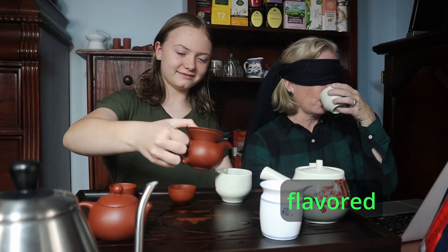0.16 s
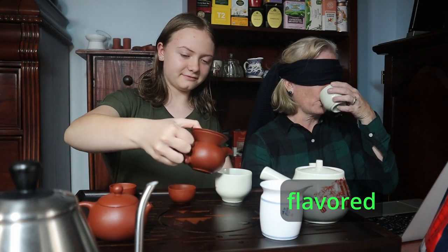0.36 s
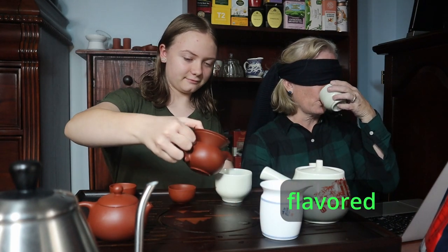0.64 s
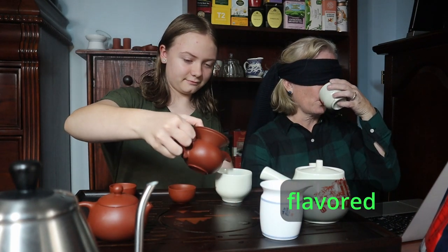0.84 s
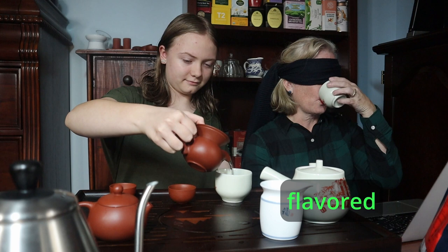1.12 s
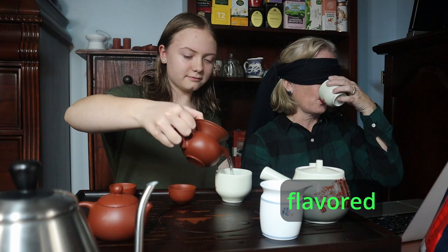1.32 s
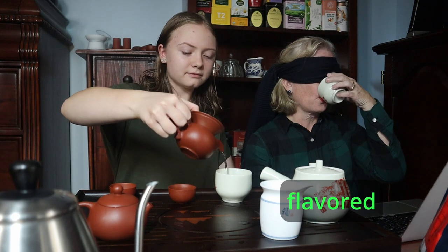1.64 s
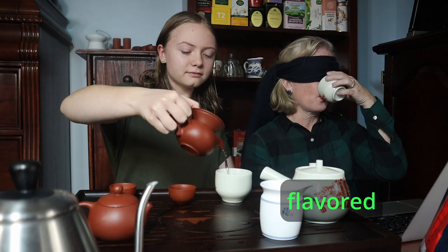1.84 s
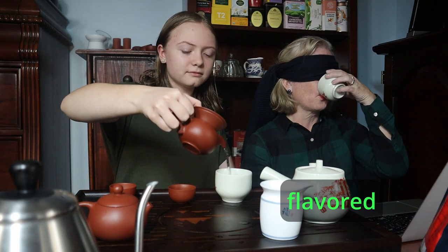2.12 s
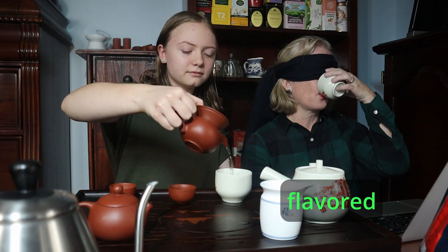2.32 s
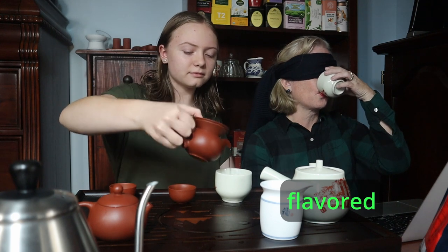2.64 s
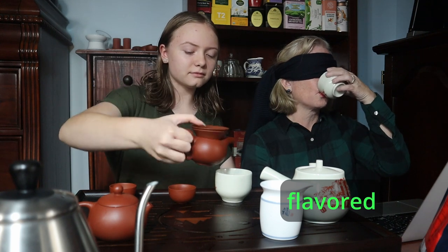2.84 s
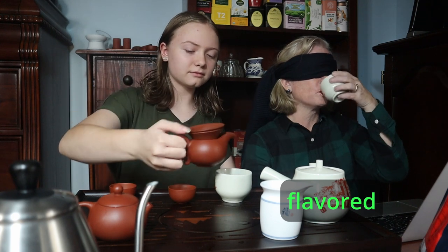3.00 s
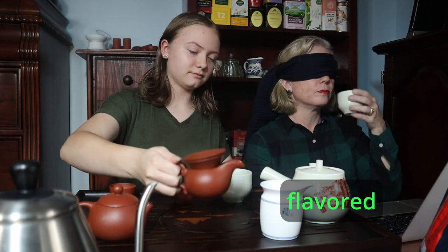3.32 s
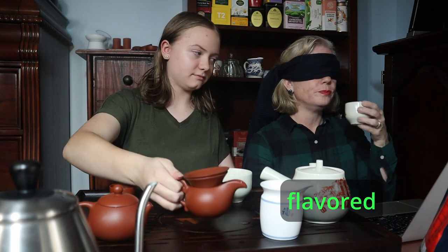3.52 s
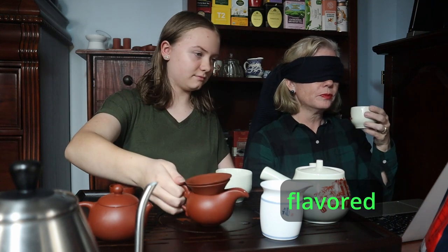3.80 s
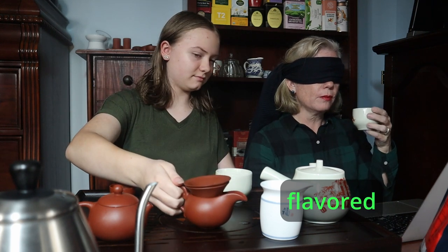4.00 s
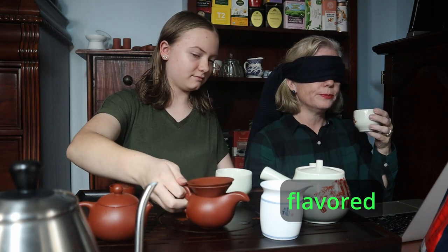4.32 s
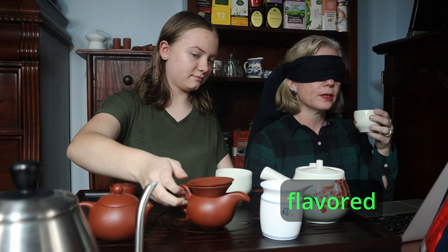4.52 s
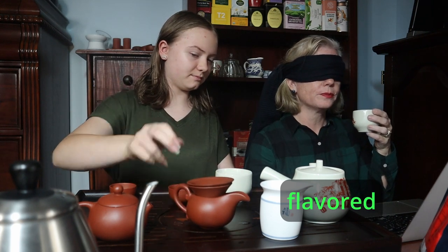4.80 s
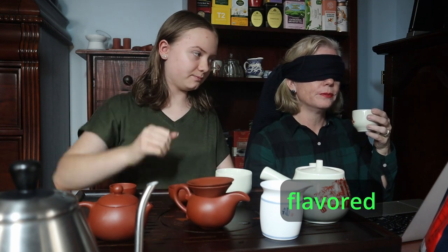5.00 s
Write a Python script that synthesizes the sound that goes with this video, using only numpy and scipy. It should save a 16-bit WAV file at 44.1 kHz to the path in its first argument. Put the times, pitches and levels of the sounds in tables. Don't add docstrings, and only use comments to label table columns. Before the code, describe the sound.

A quiet furnished room, heard closely in mono with low hiss, a trace of mains hum and a short soft echo. From 0 to 2 s there are only faint gritty rubs of a clay lid, cloth rustle and a thin trickle. From about 2.3 s drops plink in the cup, thickening at 2.5-2.8 s; at 2.85-2.95 s the spout gives rapid hollow gulps with rising chirps, fizz and a sharp splash tick. At 3.23-3.28 s crockery knocks with a bright clack and brief ring; a duller double knock follows at 3.8 s. After a soft nudge near 4.03 s, the pot lands at 4.18 s, by far the loudest event, a hard hollow wooden knock with clay ringing. It drags and rocks at 4.51, 4.65 and 4.75 s, progressively weaker, amid thin squeals and finger snaps. Small dry taps at 5.0-5.15 s close it.

```python
import sys
import numpy as np
from scipy import signal
from scipy.fft import rfft, irfft, next_fast_len
from scipy.io import wavfile
from scipy.ndimage import uniform_filter1d, map_coordinates

SR = 44100
rng = np.random.default_rng(int(sys.argv[2]) if len(sys.argv) > 2 else 0)


def wav_record(signal):
    frames = np.transpose(np.atleast_2d(signal))
    bounded = np.clip(frames, -1, 1)
    quanta = np.round(bounded * 32767).astype(np.int16)
    wavfile.write(sys.argv[1], SR, quanta)


def field_ratio(decibels):
    return 10 ** (np.asarray(decibels, dtype=float) / 20)


N = 227108

# start_s, peak_db, pitch_hz
BUBBLES = [(2.3407, -60.5, 2010), (2.4285, -58, 2250), (2.44, -63, 2010), (2.4595, -57, 2050),
           (2.469, -59, 1930), (2.475, -59, 1870), (2.494, -60, 2100), (2.5259, -47.5, 2256),
           (2.5397, -47, 2180), (2.547, -52, 1990), (2.557, -65, 1960), (2.581, -61, 2450),
           (2.615, -56, 2230), (2.6295, -43.5, 2034), (2.638, -51, 1930), (2.645, -56, 1940),
           (2.7078, -56.5, 1930), (2.726, -73, 1920), (2.7403, -52, 1970), (2.7458, -50, 1865),
           (2.7551, -57.5, 2020), (2.778, -47.5, 2095), (2.787, -63, 1960), (2.796, -60.5, 2050),
           (2.814, -55, 1930), (2.8234, -39, 1865), (2.832, -50.5, 1840), (2.84, -48, 1930),
           (2.925, -47.5, 2130), (3.6145, -52.5, 2250), (3.674, -64, 2340), (3.72, -66, 2230),
           (3.733, -68, 2420), (3.754, -65, 2230), (3.768, -71, 2320)]
# freq_hz, level_db
THUD = [(35, -55), (60, -25), (467, -1), (762, 6.5), (1030, -5.5), (1190, 2), (1330, -5), (2950, -19.5),
        (4700, -27), (5700, -26), (7500, -39.5), (15800, -75.5)]


def unit(x):
    return x / np.sqrt(np.mean(x ** 2) + 1e-20)


def along(points, hz):
    f, v = np.transpose(points)
    return np.interp(np.log(hz + 1), np.log(f + 1), v)


def wobble(rate):
    knots = rng.standard_normal(int(N * rate / SR) + 4)
    return map_coordinates(knots, [np.arange(N) * rate / SR])


def swells(rows):
    t = np.arange(N) / SR
    return sum(field_ratio(db) * np.exp(-0.5 * ((t - s) / spread) ** 2) for s, spread, db in rows)


def filtered(x, response):
    m = next_fast_len(len(x) + 8192)
    return irfft(rfft(x, m) * response(np.fft.rfftfreq(m, 1 / SR)), m)[:len(x)]


def modes(rows, f):
    return sum((-1) ** k * field_ratio(db) * 1j * f * w / (c * c - f * f + 1j * f * w)
               for k, (c, w, db) in enumerate(rows))


def noise(spectrum):
    return unit(filtered(rng.standard_normal(N), lambda hz: field_ratio(along(spectrum, hz))))


def add(track, s, piece):
    part = track[max(round(s * SR), 0):][:len(piece)]
    part += piece[:len(part)]


def room(x, delay=0.0066):
    # freq_hz, t60_s
    decay = [(150, 0.5), (500, 0.26), (2000, 0.33), (8000, 0.27), (15000, 0.24)]
    hz, t, z = signal.stft(rng.standard_normal(SR // 2), SR, nperseg=256)
    fading = z * field_ratio(-60 * t / along(decay, hz)[:, None])
    tail = signal.istft(fading, SR, nperseg=256)[1]
    late = np.pad(x, (round(delay * SR), 0))
    return signal.fftconvolve(late, tail / np.linalg.norm(tail))[:len(x)]


def bubbles(rows, t60, rise, lift_db, attack_s):
    t60 = np.clip(t60, 0.003, 0.4)
    out = np.zeros(N)
    t = np.arange(round(SR * t60) + 64) / SR
    for s, db, hz in rows:
        climb = rise * (t60 * (np.exp(-t / t60) - 1) + t)
        tone = np.sin(2 * np.pi * hz * (t + climb))
        swell = 1 - np.exp(-(t / max(attack_s, 1e-4)) ** 2)
        add(out, s, field_ratio(db + lift_db - 60 * t / t60) * swell * tone)
    return out


def ticks(rows):
    out = np.zeros(N)
    t = np.arange(512) / SR
    for s, db, hz in rows:
        burst = field_ratio(-60 * t / 0.0107) * rng.standard_normal(512)
        crack = filtered(burst, lambda f: modes([(hz, 0.49 * hz, 0)], f) ** 2)
        add(out, s, field_ratio(db - 0.5) * crack / np.abs(crack).max())
    return out


def blows(rows, body, between, between_db, wet_db, top_hz, click_db):
    out = np.zeros(N)
    t = np.arange(SR * 2 // 5) / SR
    for s, db, tilt_db, t60 in rows:
        contact = field_ratio(-60 * t / max(t60, 0.003)) * (1 - np.exp(-t / 0.0011)) * rng.standard_normal(len(t))
        contact += field_ratio(click_db) * np.linalg.norm(contact) * (t == t[8])

        def slope(f):
            return field_ratio(tilt_db * np.log2((f + 100) / 1000)) * (1j * f / (120 + 1j * f)) ** 2

        ring = unit(filtered(contact, lambda f: slope(f) * modes(body, f) / (1 + 1j * f / top_hz) ** 3))
        clack = filtered(contact[::-1], lambda f: slope(f) * field_ratio(along(between, f)))[::-1]
        clack = unit(clack * (1 - np.exp(-(t / 0.0023) ** 2)))
        hit = ring + field_ratio(between_db) * clack
        hit = field_ratio(db + 0.5) * hit / np.abs(hit).max()
        colour = np.sqrt(np.abs(uniform_filter1d(np.abs(rfft(hit)) ** 2, size=180)))
        first = np.roll(irfft(colour, len(t)), shift=150)
        add(out, s, hit + field_ratio(wet_db) * room(first))
    return out


def quiet():
    # freq_hz, level_db
    hiss = [(12, -27.5), (20, -3), (77, -8.5), (120, -9), (159, -18), (391, -19.5), (437, -38),
            (595, -26.5), (725, -29.5), (1930, -36.5), (2230, -36), (5160, -35.5), (16300, -42.5)]
    # freq_hz, level_db
    mains = [
        (59.2, -72.5),
        (177.6, -77.5),
        (296.1, -85),
    ]
    # freq_hz, level_db
    cloth_colour = [(120, -45.5), (200, 0), (350, -8), (461, -3.5), (1000, -25), (1300, -49.5),
                    (2200, -120)]
    stream_colour = [(530, -39.5), (900, -5.5), (1560, -2.5), (2130, -3), (2350, 1.5), (2870, -11.5),
                     (8000, -21), (10400, -57), (17600, -120)]
    # middle_s, spread_s, level_db
    arm = [
        (.72, 0.16, -73.5),
        (1.58, 0.096, -74),
        (2.95, 0.11, -74),
        (3.85, 0.22, -81),
        (4.28, 0.093, -64),
        (4.62, 0.12, -63.5),
    ]
    # middle_s, spread_s, level_db
    flow = [
        (.68, 0.2, -72.5),
        (2.75, 0.23, -79),
        (3.4, 0.18, -86.5),
        (3.82, 0.053, -81.5),
        (4.29, 0.061, -74.5),
        (4.67, 0.059, -65.5),
        (5.15, 0.084, -81),
    ]
    t = np.arange(N) / SR
    hum = sum(field_ratio(db + 2.5 + 0.61 * wobble(2.5)) * np.sin(2 * np.pi * hz * t + 1.3 * wobble(8.2))
              for hz, db in mains)
    cloth_rest_db, stream_rest_db = -82, -95.5
    cloth = (field_ratio(cloth_rest_db) + swells(arm)) * field_ratio(0.56 * wobble(13)) * noise(cloth_colour)
    stream = (field_ratio(stream_rest_db) + swells(flow)) * field_ratio(0.54 * wobble(26)) * noise(stream_colour)
    return field_ratio(-72) * noise(hiss) + hum + cloth + stream


def lid():
    # middle_s, half_length_s, level_db, hollow_db, bright_db
    grinds = [(0.135, 0.022, -82, 22, -11), (0.31, 0.0085, -81, 26, 6), (0.402, 0.028, -57, 4, -1.5),
              (0.582, 0.022, -73, 10, 9), (0.652, 0.016, -58.5, 16, 2), (0.663, 0.0091, -49.5, 4.5, 3),
              (0.744, 0.044, -61.5, 7.5, 8), (1.082, 0.043, -70, 9.5, 2), (1.206, 0.032, -64.5, 3, 2.5),
              (1.5, 0.024, -69, 1, 3.5), (1.537, 0.02, -74, 12, 6.5), (1.734, 0.02, -67.5, 6, -1.5),
              (1.757, 0.035, -64.5, 3, 1), (1.885, 0.031, -67, 6.5, 3)]
    # freq_hz, width_hz, level_db
    clay = [(933, 90, -4.5), (1930, 137, 5), (2256, 350, -6), (2780, 290, -12.5), (4010, 300, -11),
            (4860, 150, -19.5), (5600, 70, -8), (9000, 260, -23.5), (10870, 64, -23), (12300, 200, -28),
            (14000, 160, -45), (15300, 130, -45)]
    rim_hz, rim_width_hz = 5660, 220
    tipped_s, upright_db = 1.0, -14
    out = np.zeros(N)
    for s, half, db, hollow_db, bright_db in grinds:
        n = round(2 * half * SR)
        grit = np.hanning(n) ** 0.72 * rng.standard_normal(n)
        grain = np.repeat(rng.standard_normal(n // 64 + 1), 64)[:n]
        grit = grit * field_ratio(0.62 * grain)
        balance = [(1000, hollow_db), (1700, 0.011), (2400, 0), (3500, bright_db)]

        def colour(f):
            body = modes(clay, f)
            return body * np.abs(body) ** 0.1 * field_ratio(along(balance, f))

        def damp(f):
            return field_ratio(upright_db * (s < tipped_s) * np.exp(-((f - rim_hz) / rim_width_hz) ** 2))

        rub = filtered(np.pad(grit, (0, 600)), lambda f: colour(f) * damp(f))
        add(out, s - half, field_ratio(db) * unit(rub))
    return out + field_ratio(-14.0) * room(out)


def fingers():
    # start_s, peak_db, centre_hz
    snaps = [(3.7952, -52, 6000), (3.8262, -47, 6440), (3.2752, -45, 4300), (4.7752, -60, 5400),
             (0.3094, -64, 5300), (4.3336, -58.5, 8900), (4.3875, -68, 11200), (4.4245, -67, 11100),
             (4.6946, -54, 13500), (4.7008, -41.5, 10100), (4.7422, -42, 10900), (4.7747, -53, 9100),
             (5.0654, -49, 15200), (5.0679, -43.5, 5700), (5.012, -72, 6000), (5.021, -61, 5000),
             (5.088, -63.5, 12060), (5.124, -57.5, 8000), (5.136, -55, 10800), (5.146, -64, 12000)]
    # start_s, peak_db, pitch_hz
    pings = [(4.1772, -26, 3190), (4.1782, -36.5, 4410), (4.1781, -35.5, 5570), (4.1805, -25, 1640),
             (4.1105, -63.5, 5500), (4.1125, -57, 1530), (4.1335, -54, 2300), (4.6511, -42.2, 3420),
             (4.6512, -51.5, 4270), (4.6691, -45, 2160), (4.6801, -51.2, 2100), (4.6861, -54, 3040),
             (4.6938, -44.5, 5630), (4.7003, -42.7, 8580), (4.7412, -44.2, 2770), (4.7561, -56, 5240),
             (4.9921, -68, 4570), (5.0196, -65.2, 2250), (5.0678, -61.2, 2830), (5.1313, -43, 2830),
             (5.1375, -42.5, 2670)]
    taps = ticks(snaps) + bubbles(pings, 0.014, rise=0.0089, lift_db=3.0, attack_s=0.00036)
    return taps + field_ratio(-13.0) * room(taps)


def squeals():
    # start_s, length_s, level_db, pitch_hz
    tones = [(0.439, 0.65, -87, 2380), (3.679, 0.027, -69, 920), (4.247, .17, -71.5, 3370),
             (4.38, 0.2, -71.5, 3220), (4.362, 0.11, -78, 4500), (4.365, 0.096, -82, 13000),
             (4.52, 0.04, -75, 12200), (4.552, 0.099, -76, 5880), (4.62, .04, -71.5, 9000),
             (4.664, 0.022, -73, 10000), (4.682, 0.077, -74, 6050), (4.75, .018, -64, 11800),
             (4.786, 0.05, -76, 10000), (4.797, 0.03, -76.5, 6050)]
    out = np.zeros(N)
    for s, length, db, hz in tones:
        u = np.linspace(0, 1, round(length * SR))
        pitch = hz * (1 + 0.002 * wobble(180)[:len(u)])
        fade = np.sin(np.pi * u) ** 0.4 * field_ratio(2 * wobble(60)[:len(u)] - 5 * u)
        add(out, s, field_ratio(db) * fade * np.sin(2 * np.pi * np.cumsum(pitch) / SR))
    return out


def slide():
    # middle_s, spread_s, level_db
    drag = [
        (4.104, 0.082, -56.5),
        (4.33, 0.086, -57),
        (4.39, 0.021, -57),
        (4.465, 0.052, -48),
        (4.64, 0.22, -62.5),
    ]
    # middle_s, spread_s, level_db
    slips = [(4.47, 0.04, -78), (4.513, 0.017, -69.5), (4.61, 0.064, -74.5), (4.685, 0.021, -69.5),
             (4.74, 0.021, -59.5), (4.79, .025, -81), (4.845, 0.0048, -73.5), (4.945, 0.0043, -81.5),
             (5.04, 0.019, -81.5), (5.09, 0.015, -81)]
    # freq_hz, width_hz, level_db
    scuff = [(265, 30, -6), (430, 40, -9.5), (680, 69, 0.5), (925, 60, -2.5), (1220, 120, -13),
             (1600, 360, -17), (2050, 200, -20), (2360, 200, -25), (3080, 230, -23), (4540, 300, -38)]
    # freq_hz, level_db
    skin = [(1760, -30), (3000, -1.5), (4370, -6.5), (5200, -4), (5650, -6.5), (10700, -12), (15800, -20)]
    pressure = swells(drag) * field_ratio(-10.0 + 2.2 * wobble(60))
    scrape = filtered(rng.standard_normal(N), lambda f: modes(scuff, f) * (f / (f + 180)) ** 3)
    drone = pressure * unit(scrape)
    rub = swells(slips) * field_ratio(1.7 * wobble(67) + 2.0 * wobble(1300)) * noise(skin)
    return drone + rub + squeals()


def crockery():
    # start_s, peak_db, tilt_db_per_octave, contact_t60_s
    knocks = [
        (.6605, -62, -3.5, 0.011),
        (2.63, -57.5, -5, 0.029),
        (3.2335, -37.5, -3.5, 0.07),
        (3.2745, -30, 1.5, 0.025),
        (3.2825, -37.5, 0, 0.028),
        (3.672, -61, 2, 0.045),
        (3.7945, -35, -2, 0.066),
        (3.825, -34.5, 0.5, 0.043),
    ]
    # freq_hz, width_hz, level_db
    glaze = [(258, 14, -1), (430, 9.7, -16.5), (689, 18, -9.5), (980, 15, -3.5), (1130, 14, 0.5),
             (1834, 37, -7), (2230, 16, -7.5), (3000, 33, -18.5), (3147, 25, -8.5), (3940, 41, -25),
             (5850, 220, -14), (7700, 110, -33), (8400, 200, -19), (11100, 1500, -23.5)]
    # freq_hz, level_db
    rattle = [(59, -47), (100, -7.5), (271, -13), (593, -3.5), (1120, -5.5), (1500, -16.5), (1820, -12),
              (7060, -13.5), (15800, -37.5)]
    return blows(knocks, glaze, rattle, between_db=-0.5, wet_db=-5.5, top_hz=6000, click_db=-4.5)


def spatter(centre_hz, octaves, t60, lift_db, count):
    # middle_s, spread_s, level_db
    spells = [
        (2.44, 0.036, -65.5),
        (2.62, 0.033, -71),
        (2.781, 0.047, -72),
        (2.922, 0.054, -54.5),
    ]
    size_spread_db = 6
    rows = []
    for s, spread, db in spells:
        for when, size, pitch in np.clip(rng.standard_normal((count, 3)), -2, 2):
            hz = min(centre_hz * 2 ** (octaves * pitch), 14000)
            rows.append((s + spread * when, db + size_spread_db * size - 2.5 * when ** 2, hz))
    return bubbles(rows, t60, rise=0.25, lift_db=lift_db, attack_s=0.00039)


def drops():
    trapped = bubbles(BUBBLES, 0.022, rise=0.033, lift_db=1.5, attack_s=0.0006)
    return trapped + spatter(1070, octaves=0.42, t60=0.0089, lift_db=-2.5, count=24)


def gulps():
    # start_s, peak_db, pitch_hz
    glugs = [(2.8515, -28.5, 1190), (2.8605, -31, 1327), (2.869, -48, 1410), (2.877, -48, 1370),
             (2.8825, -29.5, 1248), (2.8905, -31.5, 1370), (2.9, -38, 1424), (2.908, -34.5, 1270),
             (2.923, -38, 1285), (2.93, -41, 1225), (2.944, -48, 1444), (2.9478, -38.5, 1490),
             (2.955, -42, 1477), (2.9661, -43.5, 1514), (2.982, -52, 1495), (2.993, -54, 1690),
             (3.016, -57, 1440)]
    # start_s, peak_db, first_pitch_hz
    chirps = [
        (2.825, -47, 1950),
        (2.856, -35, 1440),
        (2.866, -38, 1500),
        (2.891, -37, 1560),
        (2.897, -38, 1763),
        (2.744, -61, 3160),
        (2.78, -62, 3000),
    ]
    return (bubbles(glugs, 0.031, rise=0.22, lift_db=2.5, attack_s=0.0014)
            + bubbles(chirps, 0.0306, rise=0.8, lift_db=1.4, attack_s=0.0017))


def fizz():
    # start_s, peak_db, pitch_hz
    tiny = [(2.0378, -68.5, 4300), (2.1839, -62.5, 8130), (2.2109, -63.5, 6340), (2.3965, -58.5, 3500),
            (2.4204, -49, 6700), (2.4754, -62, 3600), (2.5252, -60, 3480), (2.598, -61.5, 4830),
            (2.615, -60, 4280), (2.6465, -66, 4870), (2.709, -64, 6600), (2.709, -58, 4100),
            (2.355, -67, 6500), (2.4285, -60, 5720), (2.4395, -64, 6000), (2.54, -61, 3450),
            (2.974, -48.5, 3500), (2.936, -64, 2930), (2.6294, -62, 6860), (2.7003, -56.5, 4370),
            (2.7454, -55, 3410), (2.7566, -65, 3530), (2.7766, -56.5, 6870), (2.8225, -59, 3470),
            (2.8564, -55, 3560), (2.839, -58, 3480), (2.9, -61, 3530), (2.912, -64, 3560),
            (2.925, -62, 3470), (2.949, -61, 3500), (2.985, -55, 3500), (2.8818, -44, 3540),
            (2.9093, -51.5, 5600), (2.9674, -52, 3480), (2.9961, -71, 3330), (3.0819, -64, 3660),
            (3.1334, -62.5, 7370)]
    # freq_hz, width_hz, level_db
    cup_air = [(3560, 260, 4), (4770, 590, 0), (5600, 350, 6), (6700, 400, 2), (9000, 3400, -2)]
    droplets = spatter(5170, octaves=0.57, t60=0.0044, lift_db=2.0, count=40)
    ringing = bubbles(tiny, 0.021, rise=0.1, lift_db=0.5, attack_s=0.00038)
    return ringing + filtered(droplets, lambda f: modes(cup_air, f))


def landing_cracks():
    return [(s, -57.5 + 0.5 * (db + 39), 6700 * 2 ** (0.46 * rng.normal())) for s, db, hz in BUBBLES]


def splashes(cracks):
    # start_s, peak_db, centre_hz
    lone = [(2.1244, -64, 10600), (2.2104, -62, 9000), (2.2288, -67, 12200), (2.366, -58.5, 11600),
            (2.396, -64, 14700), (2.4199, -50, 8440), (2.46, -57, 8500), (2.541, -61, 12500),
            (2.598, -56, 11900), (2.618, -59, 11100), (2.7452, -68, 10140), (2.7766, -63, 11100),
            (2.8395, -52.5, 12000), (2.8679, -52, 9460), (2.8812, -51, 8800), (2.909, -54, 11700),
            (2.9193, -53, 14100), (2.9337, -55, 12500), (2.9487, -37, 11600), (3.016, -73, 12200),
            (3.1312, -53.5, 11900), (3.2091, -77, 13300), (3.489, -63.5, 5500), (3.555, -59.5, 11100),
            (3.625, -62.5, 12570), (3.6735, -63.5, 14400), (3.697, -62, 12540), (3.8864, -63, 9100)]
    # start_s, peak_db, centre_hz
    plops = [(2.4195, -74, 1500), (2.5255, -59, 1500), (2.6295, -58, 1100), (2.7455, -63, 1100),
             (2.778, -65, 1290), (2.8235, -59, 1000), (2.8512, -50, 2600), (2.8512, -40.5, 800),
             (2.8815, -50, 2370), (2.8815, -44, 740), (2.9487, -53, 2630), (2.9487, -60, 4500),
             (2.858, -56, 5300)]
    return ticks(lone + cracks + plops)


def tea():
    cracks = landing_cracks()
    low = drops() + gulps()
    high = fizz()
    low = low * field_ratio(1.1 * wobble(700))
    high = high * field_ratio(4.1 * wobble(900)) + splashes(cracks)
    return low + high + room(field_ratio(-9.5) * (low + high), delay=0.0032)


def table():
    # start_s, peak_db, pitch_hz
    thumps = [(2.87, -58, 71), (3.8, -58, 100), (4.185, -39.5, 91), (4.24, -46, 102), (6, -53, 73),
              (3.8, -52, 64), (2.853, -56, 255), (5, -66, 244), (2.853, -59.5, 620), (4.034, -56, 130),
              (2.488, -71, 980)]
    # start_s, peak_db, pitch_hz
    pot_rings = [
        (4.177, -47, 3673),
        (4.19, -53.5, 3376),
    ]
    # start_s, peak_db, pitch_hz
    cup = [
        (3.2345, -44.5, 1110),
        (3.2365, -46.5, 1853),
        (3.249, -46, 1104),
        (3.2745, -42, 1126),
        (3.276, -43, 973),
        (3.2835, -45, 1100),
        (3.7955, -40.5, 1145),
        (3.797, -42.5, 1830),
        (3.829, -58, 1120),
        (3.856, -54, 1085),
    ]
    return (bubbles(thumps, 0.064, rise=0.01, lift_db=7.0, attack_s=0.0031)
            + bubbles(pot_rings, 0.35, rise=-0.004, lift_db=-4.0, attack_s=0.003)
            + bubbles(cup, 0.059, rise=0.002, lift_db=1.2, attack_s=0.0017))


def landing():
    # start_s, peak_db, tilt_db_per_octave, contact_t60_s
    landings = [
        (4.032, -43.5, -17, 0.16),
        (4.134, -54.5, -2, 0.04),
        (4.1768, -12, 1, 0.033),
        (4.312, -46, -5, 0.03),
        (5.13, -60.5, -18, 0.025),
    ]
    # freq_hz, width_hz, level_db
    tray = [(259, 10, -4), (437, 24, -1), (521, 33, 0), (699, 29, -2), (868, 7.3, -7), (897, 27, 1),
            (1214, 26, -2.5), (1470, 44, -8.5), (1632, 28, -6), (1720, 24, -6.5), (2133, 36, -7.5),
            (2940, 60, -15.5), (3020, 880, -16), (3530, 6, -21.5)]
    return blows(landings, tray, THUD, between_db=-5.5, wet_db=-13.5, top_hz=4600, click_db=-4.0)


def boards():
    # start_s, peak_db, pitch_hz
    wood = [(4.1756, -14, 505), (4.178, -21.5, 897), (4.179, -24.5, 1248), (4.181, -25.5, 1050),
            (4.18, -20, 707), (4.365, -48, 645), (4.405, -49, 670), (4.412, -51, 925), (4.472, -52, 700),
            (4.487, -45, 950), (4.6512, -49, 2050), (4.6615, -43.5, 1940), (4.3125, -44.5, 614),
            (4.317, -42.5, 397), (4.5115, -27.5, 556), (4.515, -29, 982), (4.516, -32, 690),
            (4.517, -44.5, 2170), (4.651, -35, 615), (4.6515, -47, 960), (4.662, -38.5, 664),
            (4.662, -48, 950), (4.7462, -41, 434), (4.751, -43.5, 684), (4.751, -43.5, 910)]
    # start_s, peak_db, pitch_hz
    cavity = [(4.186, -31, 431), (4.184, -31, 257), (4.2, -36.5, 300), (4.322, -44.5, 266),
              (4.52, -35.5, 446), (4.534, -40, 445), (4.521, -36, 263.3), (4.53, -46, 864),
              (4.654, -42, 441.3), (4.664, -41, 438), (4.752, -41.5, 437), (4.756, -42, 265)]
    notes = bubbles(wood, 0.035, rise=0.002, lift_db=2.0, attack_s=0.00058)
    notes += bubbles(cavity, 0.12, rise=0.002, lift_db=1.7, attack_s=0.0028)
    return notes + field_ratio(-14.5) * room(notes)


def rocking():
    # start_s, peak_db, tilt_db_per_octave, contact_t60_s
    rocks = [
        (4.5055, -49, 0, 0.009),
        (4.511, -29.5, -3.5, 0.0068),
        (4.517, -30, -3, 0.022),
        (4.6505, -37.5, 6, 0.011),
        (4.6625, -41, 9.5, 0.013),
        (4.7505, -42, -8, .02),
    ]
    # freq_hz, width_hz, level_db
    loaded = [(225, 9.8, -9), (265.6, 24, -0.5), (385, 28, -4), (452, 16, 0), (686, 32, -2.5),
              (852, 20, -10.5), (957, 110, -9.5), (1100, 60, -9), (1370, 24, -11), (1766, 110, -9.5),
              (2166, 260, -12.5), (3040, 150, -16.5), (3530, 300, -22)]
    return blows(rocks, loaded, THUD, between_db=-8, wet_db=-9.5, top_hz=4100, click_db=-5.5)


def scene():
    knocking = crockery
    pouring = lid() + tea()
    knocking = crockery() + landing() + rocking() + table() + boards()
    handling = fingers() + slide()
    return (pouring + knocking + handling + quiet())[None]


def roll_off(x):
    return signal.sosfilt(signal.butter(12, 16450, fs=SR, output="sos"), x)


def record(dry):
    mix = filtered(dry[0], lambda hz: hz < 16350)[None]
    return roll_off(mix)


dry = scene()
out = record(dry)
wav_record(out)
```